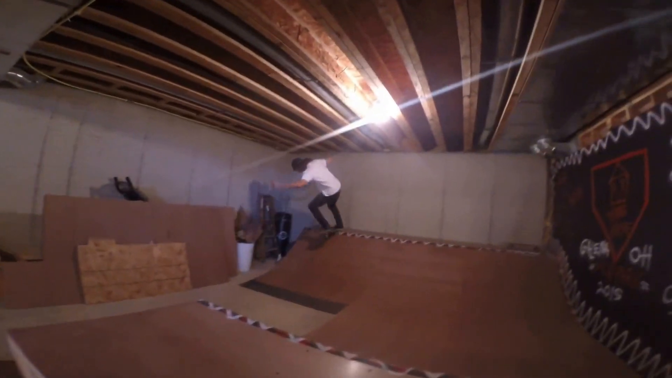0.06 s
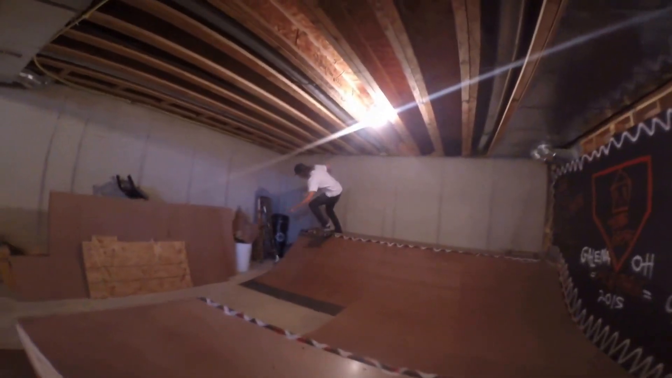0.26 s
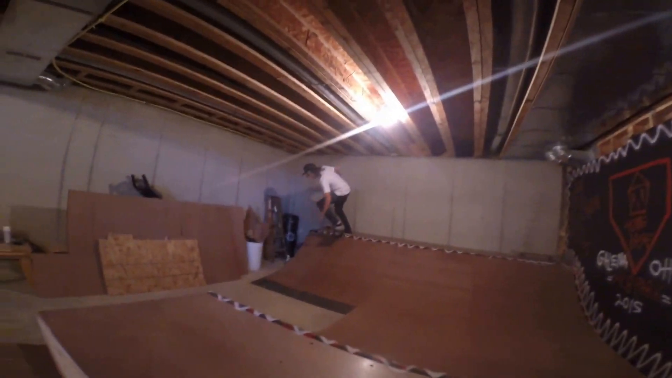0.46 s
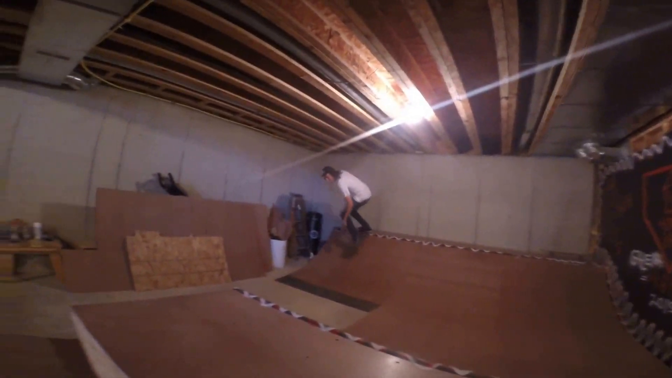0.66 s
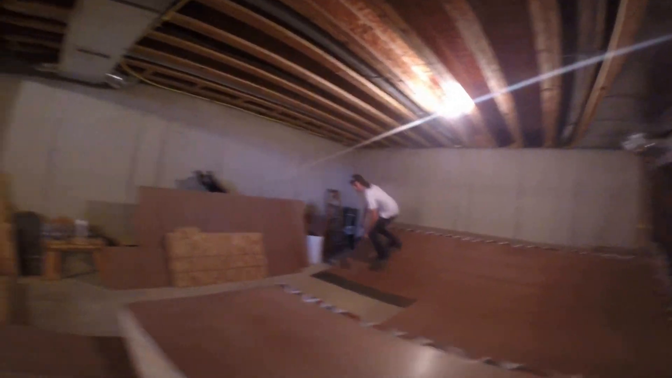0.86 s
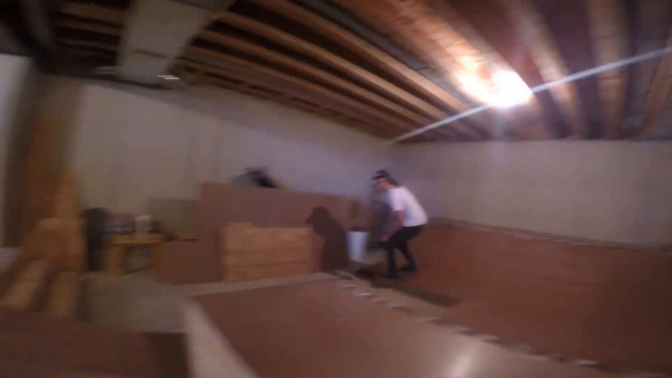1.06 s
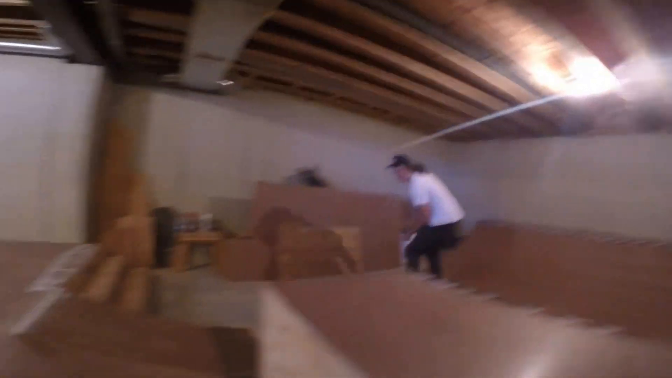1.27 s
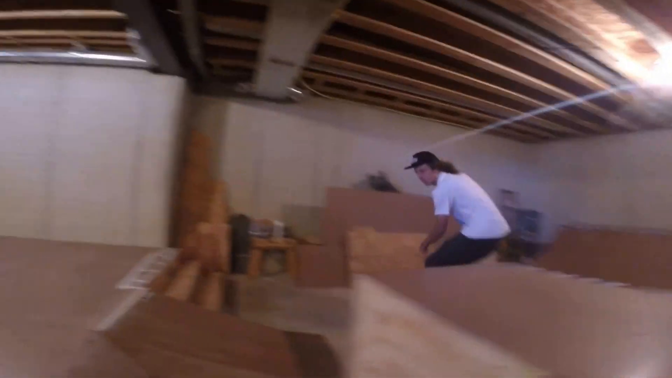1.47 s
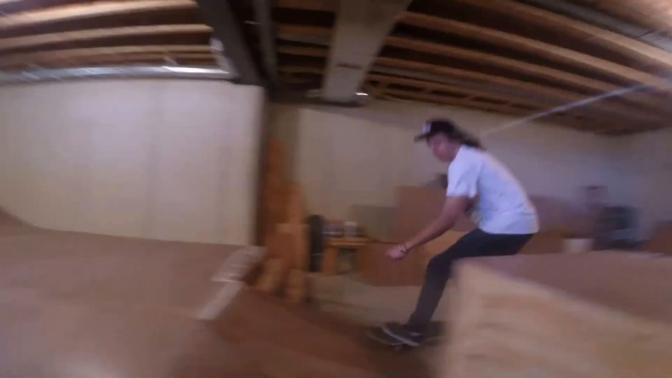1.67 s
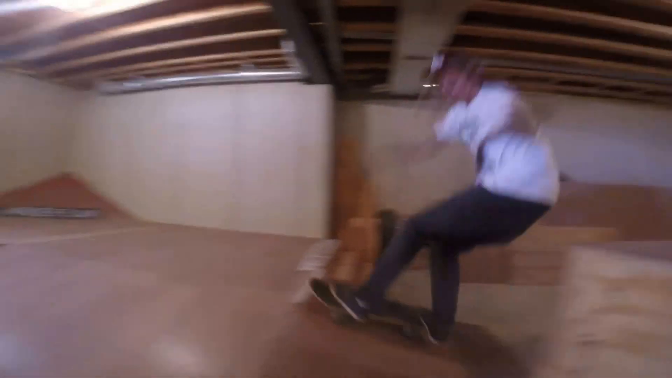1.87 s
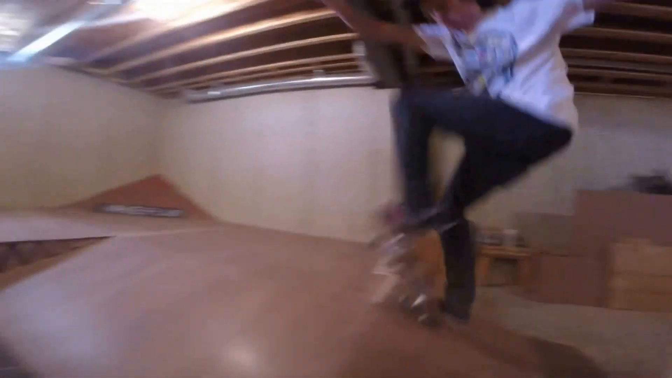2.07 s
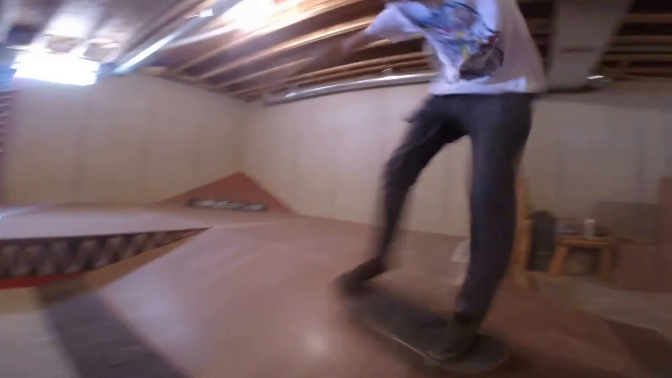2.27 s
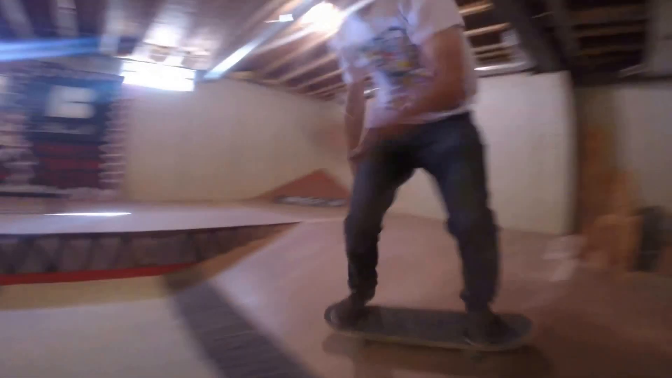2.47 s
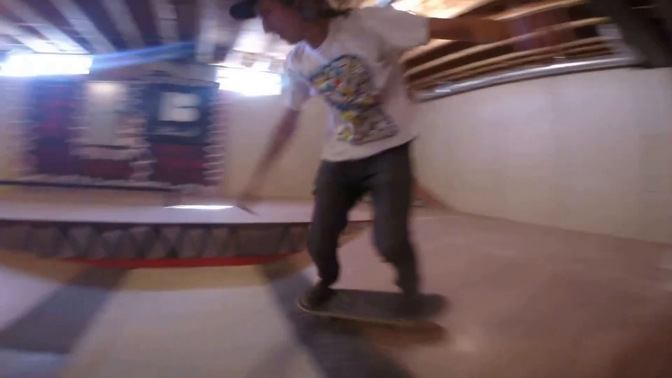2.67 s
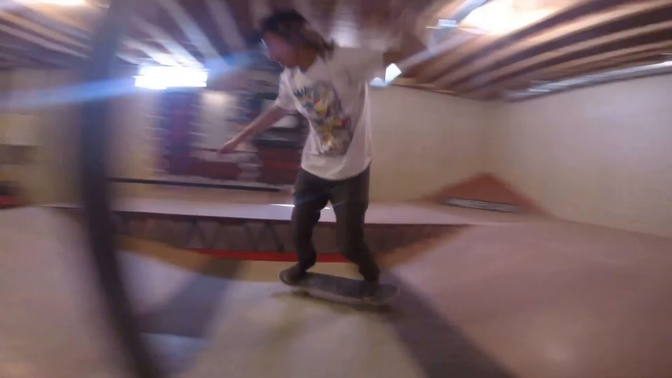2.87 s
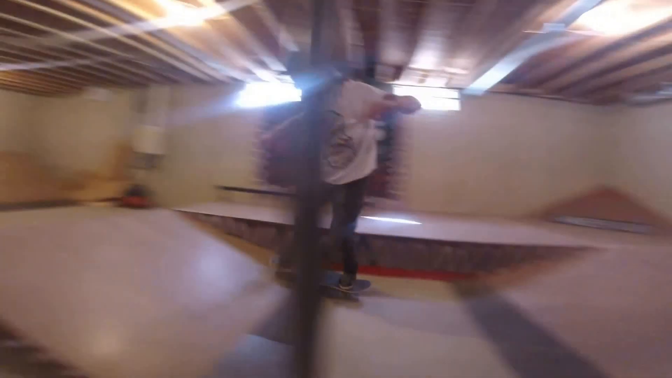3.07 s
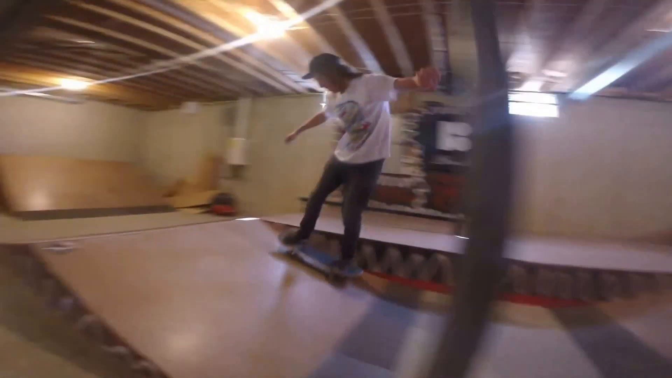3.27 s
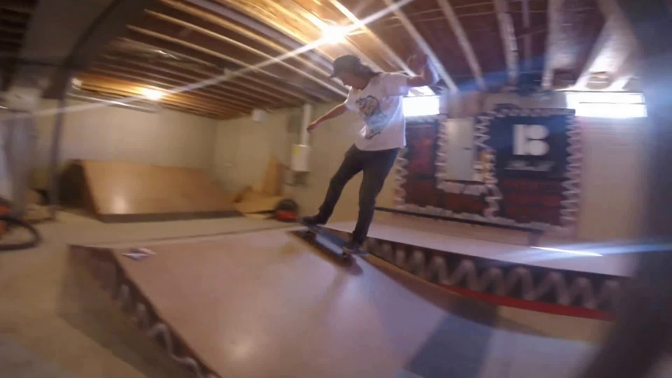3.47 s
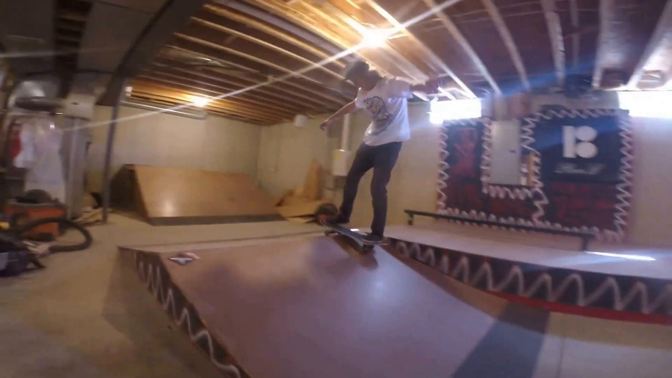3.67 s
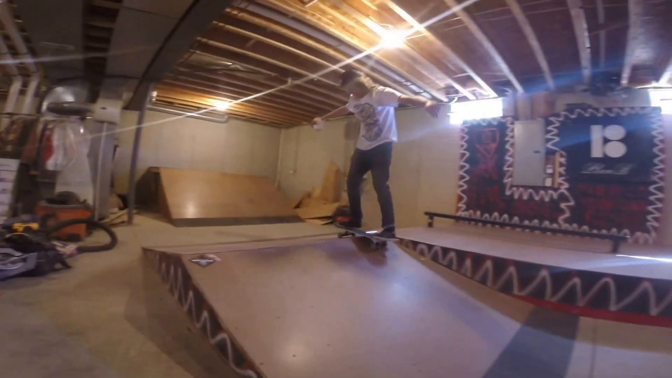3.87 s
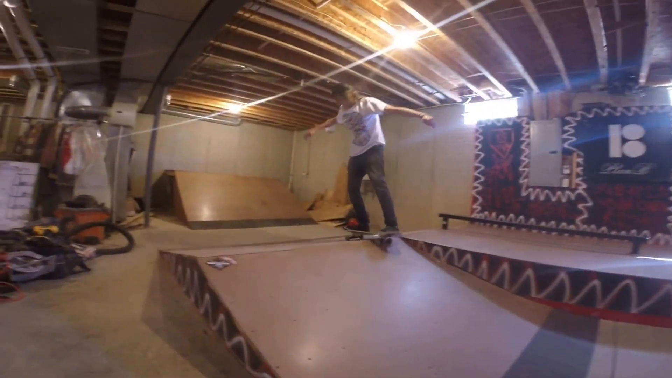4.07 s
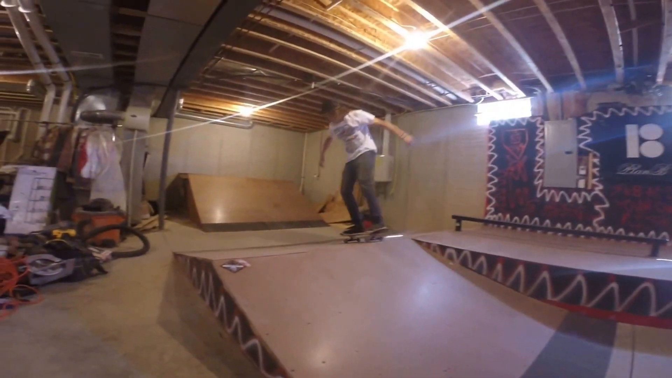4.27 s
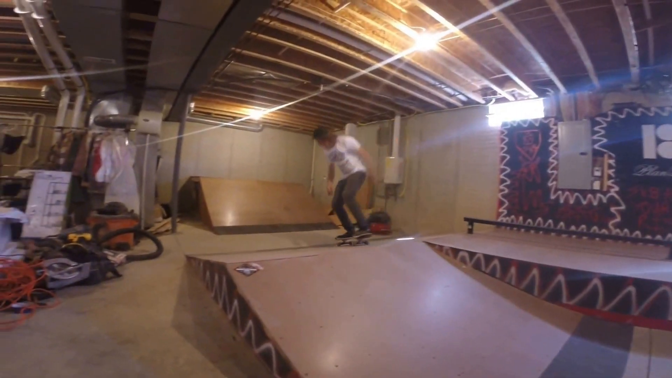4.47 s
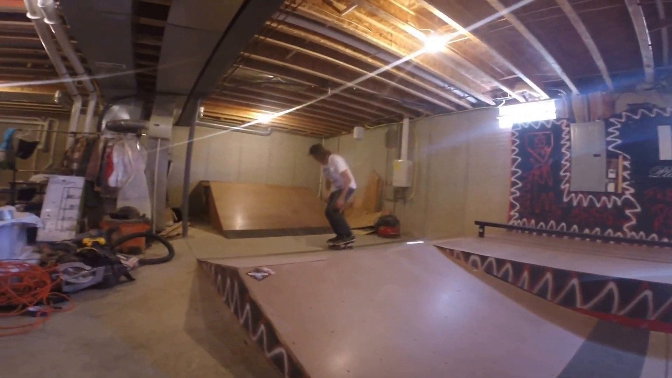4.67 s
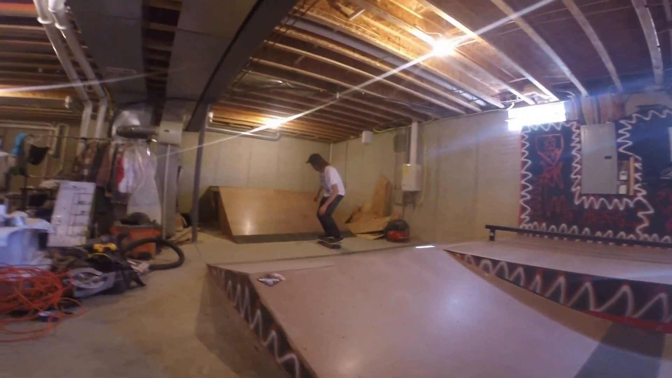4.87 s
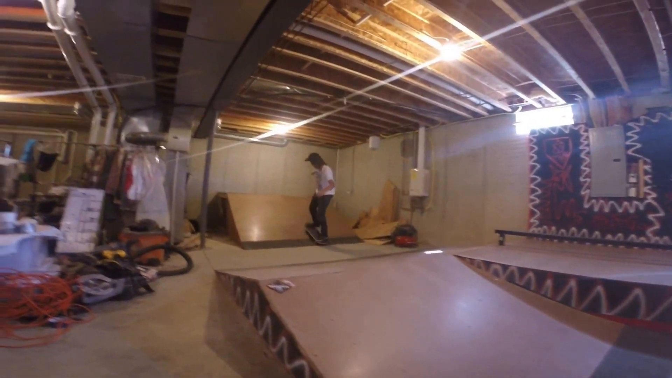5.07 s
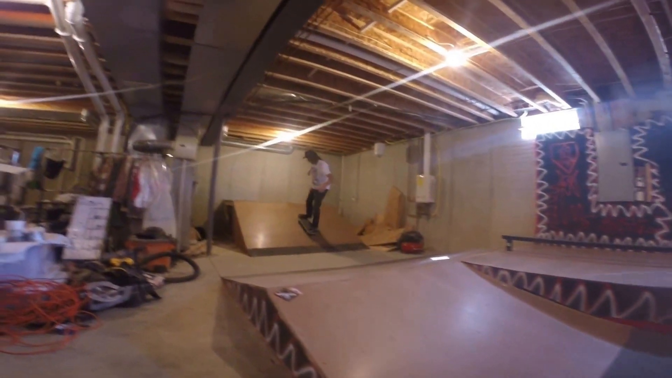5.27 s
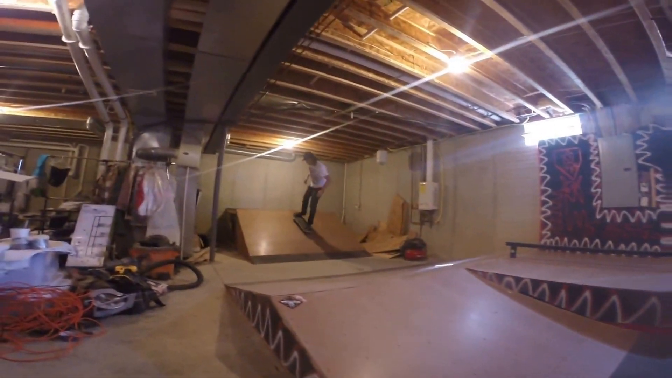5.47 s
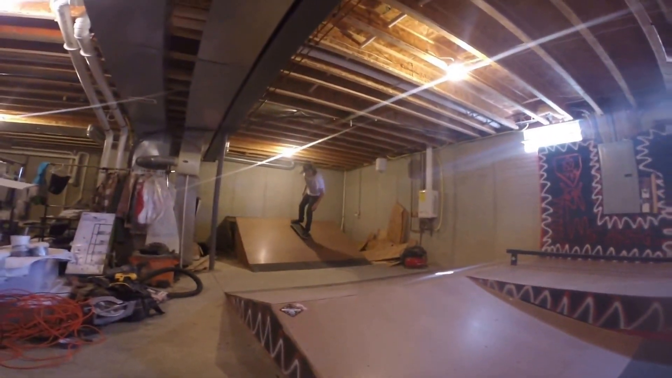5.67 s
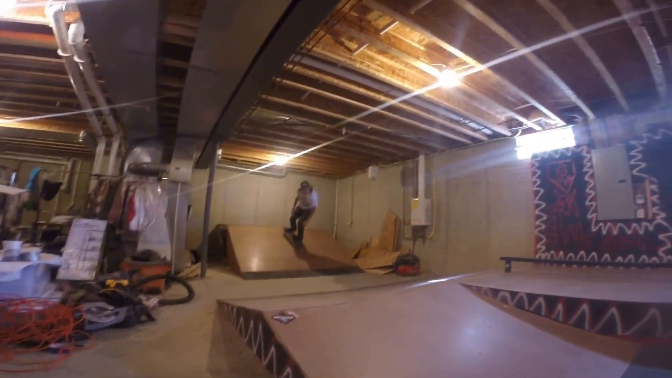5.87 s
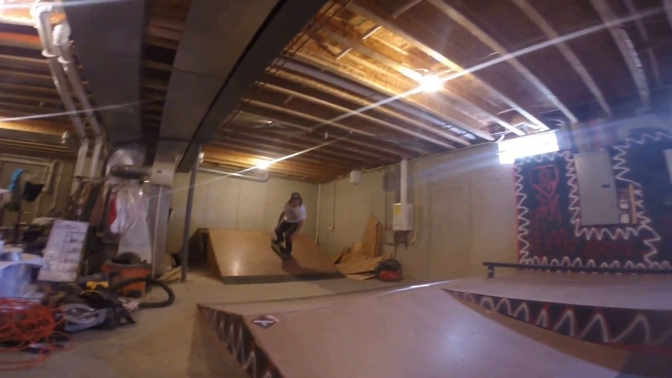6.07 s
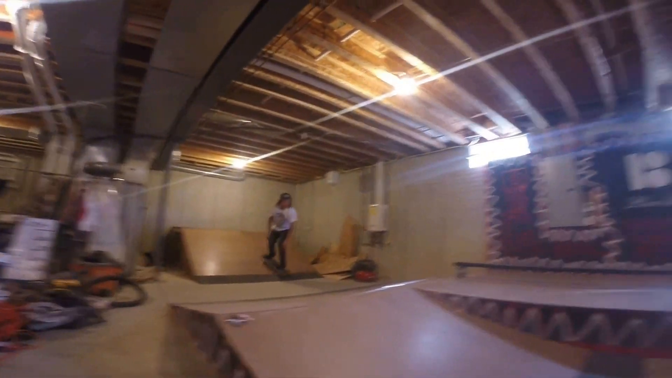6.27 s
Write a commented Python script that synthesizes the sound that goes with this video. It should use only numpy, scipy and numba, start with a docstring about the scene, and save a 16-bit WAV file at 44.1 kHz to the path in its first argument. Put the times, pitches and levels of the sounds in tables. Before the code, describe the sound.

A skateboard rolls over plywood ramps and concrete in a low basement, each hit leaving a short echo. It starts quietly, with single knocks at about 0.3 and 0.8 seconds. Around 1.2 seconds the wheels swell into a brief hollow rumble with several small knocks. Two sharp clacks come close together near 1.8 seconds, and at 2.4 seconds the board slaps down, the loudest sound by far. From 2.7 to 3.4 seconds the wheels clatter over ramp edges and the rumble rises again. One knock follows at 3.7 seconds, then the rolling drops low. Between 4.7 and 5.3 seconds there is another surge of rumbling with several rattling clacks. It fades to faint rolling and a few light ticks by about 6.3 seconds. The small camera microphone gives a slightly boxy tone, with faint hiss and a thin whine underneath.

```python
"""Knocks, slaps and rolling rumble of a skateboard on plywood ramps and concrete in a low basement.
Wheels chatter on the ground and knock over ramp edges and seams; the deck slaps down.
These forces ring floor, hollow ramps, deck, wheels and trucks; the bare room rings on.
A small camera's case colours it all with its resonances; the electronics hiss and whine faintly."""
import sys
import numpy as np
from scipy import signal
from scipy.fft import rfft, irfft, next_fast_len
from scipy.io import wavfile
from scipy.ndimage import uniform_filter1d
from numba import njit

SR = 44100
rng = np.random.default_rng(int(sys.argv[2]) if len(sys.argv) > 2 else 0)


def pcm_store(signal):
    """Save signal as 16-bit PCM."""
    levels = np.round(np.clip(np.atleast_2d(signal), -1, 1) * 32767)
    wavfile.write(sys.argv[1], SR, levels.astype(np.int16).T)


N = 278265

# Wheel, truck and tail strikes. Each row: start in seconds, level in dB, hollowness in dB,
# hardness in dB, rattle decay time in seconds, room send in dB.
BLOWS = [(.144, -64.5, -11, 7, 0.029, 1), (0.184, -60, 12, 5.5, 0.016, 5),
         (.218, -47.5, -26, -16, 0.012, -1), (0.299, -30.5, -15, -3.5, 0.006, -1),
         (.795, -37, 3.5, -5.5, 0.012, -0.5), (0.841, -44.5, 0.5, -2.5, 0.016, 6),
         (1.131, -42.5, 5, 7.5, 0.014, 1.5), (1.198, -34.5, -2, -6, 0.016, -12),
         (1.234, -43.5, 0, 10, 0.0078, 0), (1.291, -36, 0, -4, 0.017, 4.5), (1.441, -54, 12, -5, 0.015, -2),
         (1.615, -44, -2.5, -3.5, 0.011, 4.5), (1.748, -21.5, -5, 9, 0.026, -5),
         (1.8345, -21, -2, 10, 0.02, -5), (2.173, -32, -3.5, -0.5, 0.0042, -2),
         (2.3647, -17.5, 1, -2, 0.0076, 1.5), (2.3684, -9, -3.5, -7.5, 0.0076, -3.5),
         (2.731, -47, 9, -1, 0.0098, -11), (2.741, -41, -14, 9.5, 0.0078, -3.5),
         (2.786, -38, 6.5, 2.5, 0.012, -1.5), (2.85, -30, 0.5, 2.5, 0.012, -3.5),
         (2.888, -35.5, 3, 2, 0.022, -8), (2.989, -31, -6.5, -9, 0.01, -20),
         (3.072, -46, -6, 5.5, .025, -10), (3.095, -39.5, -2, 9.5, 0.014, -1),
         (3.109, -29, -8, 0.5, 0.021, -13), (3.169, -34.5, 5.5, -2, 0.0075, -3),
         (3.194, -27.5, 0, 7, 0.034, -12.5), (3.721, -38, -3.5, -3.5, 0.0074, 0),
         (3.976, -63.5, -16, 8, 0.032, 5), (4.33, -46, 1, -4, 0.016, 0), (4.562, -66, 17, -9, 0.0082, 9),
         (4.702, -40, 2.5, 2, 0.033, -1), (4.786, -46, 10.5, 4.5, 0.022, 4.5),
         (4.9, -39.5, -1, -1, 0.012, 8), (5.068, -38.5, -3, 7.5, 0.02, 5),
         (5.162, -33.5, 5.5, 10.5, 0.049, -5.5), (5.601, -49, -7, -4, .012, 4.5),
         (5.643, -48.5, -10, -5, 0.01, 0.5), (5.832, -55, -3, -9, 0.012, 4)]
# Rolling force. Each row: time in seconds, level in dB, ground hollowness in dB, hardness in dB.
ROLLING = [(0, -55.5, 3, 2), (.12, -68, 3.5, -1), (.4, -58.5, -3, -5.5), (.64, -75.5, 7, 4),
           (.71, -69, -1, 9), (.78, -73, 8, 9), (.9, -54, 1, -10), (1.0, -56.5, 6, -5), (1.1, -54, 3, -3),
           (1.24, -37.5, -3.5, -1), (1.36, -42, -10, -15), (1.52, -53.5, -1.5, 0.5), (1.7, -50.5, 1, -9),
           (1.95, -42.5, 0.5, 11.5), (2.12, -55.5, -2, -1), (2.33, -61, 3.5, -13), (2.55, -44.5, 0.5, 3.5),
           (2.72, -52, 6, -8), (2.93, -48, 8, 8), (3.07, -46.5, -0.5, -5), (3.2, -42, 0.5, 4),
           (3.34, -40.5, -1.5, 3), (3.45, -55, 4, 4), (3.7, -59.5, 2, 7), (4.15, -72.5, 4.5, 3.5),
           (4.35, -60.5, 1, -2), (4.66, -65.5, 10.5, 0), (4.8, -44.5, -3, 2), (5.04, -49.5, -6.5, -7),
           (5.25, -40, -2.5, -1), (5.5, -60, 4, 3), (5.75, -65, 2, 1.5), (6.04, -74.5, 11, 8.5),
           (6.169, -60.5, -4, 11), (6.31, -62, 10, -6)]
# Force on the hard parts against the deck. Each entry: offset in dB, dB per dB of hardness.
BLOW_HARD_SHARES = dict(wheels=(-2.1, 0.7), trucks=(-6, 1.18), grit=(-17.5, 0.93))
ROLL_HARD_SHARES = dict(wheels=(0, 0.72), trucks=(-7.5, 0.81), grit=(-21.5, 0.51))
# Force on the concrete. Each: dB at a level of -50 dB, dB per dB of level, dB per dB of hollowness.
BLOW_FLOOR_SHARE, ROLL_FLOOR_SHARE = (-56, .45, .47), (-54.5, .67, .11)
# Changing ground. Each row: time in seconds, then gains in dB for floor, wheels and grit.
GROUND_GAINS = [(0, -1, -2, -2), (.15, -0.5, 4.5, 5), (.35, 4, 5, -7), (.72, 0, 1, 3), (.9, 8.5, 1.5, 1),
                (1.38, -6.5, -1, -4), (1.46, 7.5, 0, 4), (1.72, -13, -2, -7), (1.95, -11, -1.5, 0.5),
                (2.34, 1, 3.5, 1), (2.47, -6, 1.5, 3), (2.74, 7.5, 2, 2.5), (2.95, 9, -4.5, -4.5),
                (3.1, -12, 1.5, 6.5), (3.38, -0.5, -0.5, 6), (3.46, 4.5, 3, 3), (3.75, -2, -3.5, 1),
                (4.02, -3, 2.5, 1), (4.3, 0, -0.5, -1), (4.7, 8.5, -3.5, 3), (5.0, -6, 1, 3),
                (5.3, 1.5, 3, 2), (5.9, -1.5, -1, -3), (6.17, -1, 4.5, 4), (6.31, 0, 0, 0)]
# Ringing by place under wheels and feet. Each row: time in seconds, ramp hollow in Hz,
# deck ring in Hz, deck ring lift in dB, bearing whirr lift in dB.
RING_PATH = [(0, 239, 1690, 4.5, -3), (.2, 440, 1700, 7.5, 4), (.33, 206, 1780, 8, -6),
             (1.0, 190, 1720, 4, -1), (1.12, 385, 1700, 2, -3), (1.2, 300, 1710, 5, -11),
             (1.33, 620, 1660, 0.5, 1), (1.47, 344, 1690, 3.5, 5), (1.66, 604, 1680, 3, 3),
             (1.95, 296, 1910, 10, 1), (2.37, 260, 1790, 0.5, -4), (2.5, 530, 1750, 4, 6),
             (2.7, 217, 1570, 6.5, 7), (3.02, 273, 1530, 7, 4), (3.15, 416, 1760, 8, 0.5),
             (3.7, 227, 1560, 8, 12), (4.5, 196, 1720, 5, -3), (5.08, 490, 1860, 6, 2),
             (5.2, 326, 1670, 8.5, 3.5), (5.68, 241, 1620, 6, 2), (6.31, 230, 1670, 6, 5)]
# Bands of floor, ramp, deck, wheels, trucks, grit. Each point: Hz before BODY_STRETCH, relative dB.
PART_BANDS = dict( floor=[(20, -48), (45, 3.5), (90, -4), (140, 4), (250, -46)], ramp=[(90, -39.5),
              (160, 1), (300, -3), (700, -1), (1100, -6), (1600, -66)], deck=[(700, -20), (1150, -6),
              (1600, -2), (2200, -12), (3200, -42.5)], wheels=[(1500, -10), (2300, -0.5), (3500, 3),
              (4400, -8), (6000, -39)], trucks=[(3200, -4), (4600, 4.5), (6000, 1.5), (7500, -5.5),
              (10000, -51)], grit=[(5500, -14), (8000, 6.5), (11000, 0), (13500, -18.5), (15000, -51)], )
# Plywood modes, then deck and bearing modes, laid over all parts.
# Each row: centre and width in Hz before BODY_STRETCH, gain in dB.
RAMP_MODES = [(79, 27, 8), (207, 95, 3.5), (314, 62, -0.5), (346, 99, 2), (462, 120, 4), (670, 45, 0.5)]
DECK_MODES = [(815, 170, 0), (1086, 65, 2), (1390, 220, 2.5), (2345, 480, 2.5), (3580, 51, -0.5)]
# Basement decay. Each row: frequency in Hz, T60 in seconds.
BASEMENT_T60 = [(100, 0.64), (300, 0.56), (800, 0.66), (2000, 0.51), (5000, 0.55), (12000, 0.24)]
# Case cavities. Each row: centre in Hz, width in Hz, gain in dB.
CASE_MODES = [(1860, 270, 3.5), (2655, 480, 3.5), (3546, 165, 3.5), (5760, 500, 7), (7100, 143, 2)]
# Rumble and hiss spectrum. Each row: frequency in Hz, relative density in dB.
NOISE_SPECTRUM = [(15, -12.5), (25, 8), (69, -1), (213, -14), (3630, -29), (5140, -86), (5720, -19),
                  (6720, -106), (9020, -33), (15000, -43)]
# Electronic whine. Each row: frequency in Hz, RMS level in dB.
WHINE_TONES = [(5846, -76), (8780, -80.5), (11700, -87), (14626, -98)]

IR_SAMPLES, BODY_STRETCH = 4096, 4512 / 4096


def blows():
    """Each blow is a short rattle of contacts. Returns direct and room-bound force per part."""
    near, far = np.zeros((2, 6, N + SR))
    t = np.arange(SR // 5) / SR
    slowness = np.array([3, 2.2, 1.4, 1, .6, .4])[:, None]  # heavy parts start slower
    for start_s, level_db, hollow_db, hard_db, decay_s, room_db in BLOWS:
        contacts = bumps((6, len(t)), spread_db=2.5)
        rise_s = .0014 * (decay_s / .015) ** 2.12
        envelope = (1 - np.exp(-(t / (rise_s * slowness)) ** 1.2)) * np.exp(-t / decay_s)
        part_db = shares_db(level_db, hollow_db, hard_db, BLOW_FLOOR_SHARE, BLOW_HARD_SHARES)
        force = contacts * envelope * undb(part_db)[:, None]
        i = int(start_s * SR)
        near[:, i:i + len(t)] += force
        far[:, i:i + len(t)] += force * undb(room_db)
    return near[:, :N], far[:, :N]


def rolling():
    """Hard wheels chatter over the ground's grain in uneven patches. Returns force per part."""
    part_db = shares_db(*tracks(ROLLING), ROLL_FLOOR_SHARE, ROLL_HARD_SHARES)
    flicker_db = .9 * np.array([wander(rate_hz) for rate_hz in (25, 30, 35, 40, 45, 50)])
    patch_db = 1.3 * wander(rate_hz=35)
    return bumps((6, N), spread_db=1.92) * undb(patch_db + part_db + flicker_db)


def shares_db(level_db, hollow_db, hard_db, floor_share, hard_shares):
    """Force level per part: hollow ground feeds floor and ramp, hard contact the top three."""
    base_db, per_level, per_hollow = floor_share
    floor_db = base_db + per_level * (level_db + 50) + per_hollow * hollow_db
    upper_db = [level_db + offset_db + per_hard * hard_db for offset_db, per_hard in hard_shares.values()]
    return np.array([floor_db, level_db + hollow_db, level_db] + upper_db)


def ground_gain():
    """The ground under the wheels scales the force on floor, wheels and grit."""
    floor_db, wheels_db, grit_db = tracks(GROUND_GAINS)
    flat = np.zeros(N)
    return undb([floor_db, flat, flat, wheels_db, flat, grit_db])


def bodies(force):
    """Each part rings in its band; ramp and deck also ring at a moving pitch, the bearings whirr."""
    hz = bin_hz(IR_SAMPLES) / BODY_STRETCH
    modes_db = peaks_db(RAMP_MODES, hz) + peaks_db(DECK_MODES, hz)
    responses = np.array([impulse_response(curve_at(band, hz) + modes_db) for band in PART_BANDS.values()])
    floor, ramp, deck, wheels, trucks, grit = convolve(force * ground_gain(), responses)
    hollow_hz, deck_hz, deck_db, whirr_db = tracks(RING_PATH)
    ramp = .6 * resonate(ramp, hollow_hz, q=1.56, lift_db=8.5)
    deck = .76 * resonate(deck, deck_hz, q=8.5, lift_db=deck_db)
    wheels = resonate(wheels, np.full(N, 3550.), q=42., lift_db=whirr_db)
    return floor + ramp + deck + wheels + trucks + grit


def basement(sound, onset_s=.0023):
    """Dense wall echoes in half-octave bands, each dying at its own rate."""
    size = next_fast_len(SR)
    t, hz = np.arange(size) / SR, bin_hz(size)
    spectrum = rfft(rng.standard_normal(size))
    tail = np.zeros(size)
    for centre_hz in 30 * 2 ** np.arange(0, 9.5, .5):
        window = np.clip(1 - 2 * abs(np.log2(hz / centre_hz)), 0, 1)
        t60_s = curve_at(BASEMENT_T60, centre_hz)
        tail += irfft(spectrum * window, size) * undb(-60 * t / t60_s) / np.sqrt(t60_s)
    tail *= 1 - np.exp(-t / onset_s)
    return convolve(sound, tail / np.linalg.norm(tail))


def case(sound):
    """Cavities in front of the microphone lift a few bands."""
    return convolve(sound, impulse_response(peaks_db(CASE_MODES, bin_hz(IR_SAMPLES))))


def electronics(noise_db=-56):
    """Wavering low rumble and hiss, with a thin, slightly unsteady whine."""
    size = next_fast_len(N)
    spectrum = rfft(rng.standard_normal(size)) * undb(curve_at(NOISE_SPECTRUM, bin_hz(size)))
    noise = unit_rms(irfft(spectrum, size)[:N])
    clock_s = np.cumsum(1 + .00111 * wander(rate_hz=25)) / SR
    whine = sum(np.sqrt(2) * undb(db) * np.sin(2 * np.pi * hz * clock_s) for hz, db in WHINE_TONES)
    return noise * undb(noise_db + .5 * wander(rate_hz=10)) + whine


def bumps(shape, spread_db):
    """Dense contacts of uneven size, unit RMS."""
    return unit_rms(rng.standard_normal(shape) * undb(spread_db * rng.exponential(size=shape)))


def wander(rate_hz):
    """Random held steps, smoothed twice."""
    hold = int(SR / rate_hz)
    steps = np.repeat(rng.standard_normal(N // hold + 1), hold)
    return .46 * uniform_filter1d(uniform_filter1d(steps, hold), hold)[:N]


def resonate(x, hz, q, lift_db):
    """Lift a band around a per-sample centre."""
    return x + (undb(lift_db) - 1) * bandpass(x + 1e-18, hz, q)


@njit
def bandpass(x, hz, q):
    """State-variable filter, unity gain at the centre."""
    y = np.empty(len(x))
    band_state = low_state = 0.
    for i in range(len(x)):
        g = np.tan(np.pi * hz[i] / SR)
        band = (band_state + g * (x[i] - low_state)) / (1 + g * (g + 1 / q))
        band_state = 2 * band - band_state
        low_state += 2 * g * band
        y[i] = band / q
    return y


def impulse_response(gain_db):
    """Minimum phase, unit energy."""
    cepstrum = irfft(gain_db * np.log(10) / 20, IR_SAMPLES)
    cepstrum[1:IR_SAMPLES // 2] *= 2
    cepstrum[IR_SAMPLES // 2 + 1:] = 0
    response = irfft(np.exp(rfft(cepstrum)), IR_SAMPLES)
    return response / np.linalg.norm(response)


def tracks(table):
    """One per-sample curve for each column after the time."""
    times_s, *columns = np.transpose(table)
    return [np.interp(np.arange(N) / SR, times_s, column) for column in columns]


def curve_at(points, hz):
    """Interpolate on a log-frequency axis."""
    points_hz, values = np.transpose(points)
    return np.interp(np.log(hz), np.log(points_hz), values)


def peaks_db(modes, hz):
    """Resonance humps on a flat response."""
    return sum(db / (1 + (2 * (hz - centre_hz) / width_hz) ** 2) for centre_hz, width_hz, db in modes)


def convolve(x, response):
    return signal.oaconvolve(x, response, axes=-1)[..., :N]


def bin_hz(size):
    return np.maximum(np.arange(size // 2 + 1) * SR / size, 1)


def undb(db):
    return 10 ** (np.asarray(db) / 20)


def unit_rms(x):
    return x / np.sqrt(np.mean(x ** 2))


def scene(roll_room_db=-18.5):
    """Skateboard and echoes through the case, plus electronics; mono."""
    roll = rolling()
    near, far = blows()
    direct = bodies(near + roll)
    echoes = basement(bodies(far + undb(roll_room_db) * roll))
    return (case(direct + echoes) + electronics())[None]


def record(dry, cutoff_hz=15000):
    """The converter clips at full scale and cuts the top."""
    lowpass = signal.ellip(10, .2, 90, cutoff_hz, fs=SR, output="sos")
    return signal.sosfilt(lowpass, np.clip(dry, -1, 1))


dry = scene()
out = record(dry)
pcm_store(out)
```